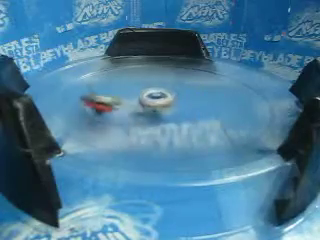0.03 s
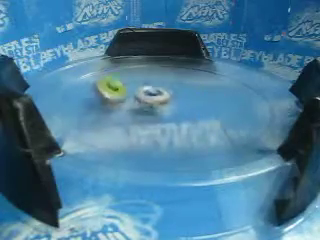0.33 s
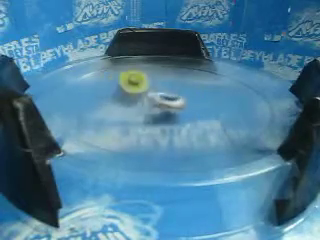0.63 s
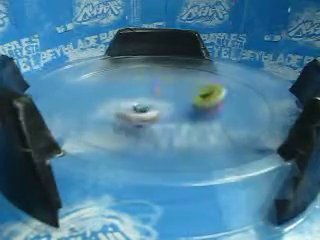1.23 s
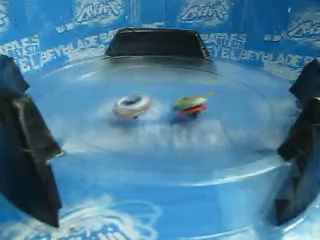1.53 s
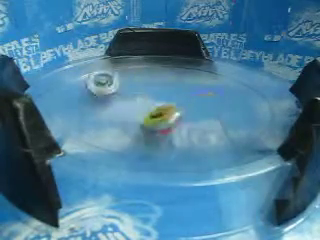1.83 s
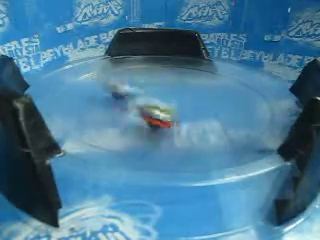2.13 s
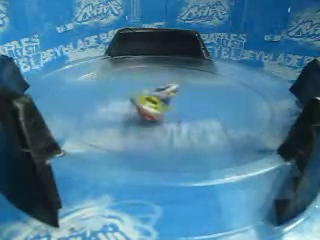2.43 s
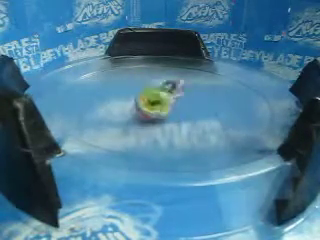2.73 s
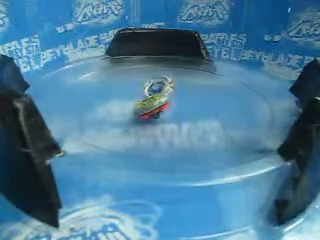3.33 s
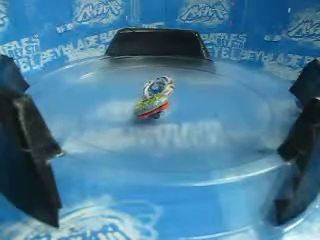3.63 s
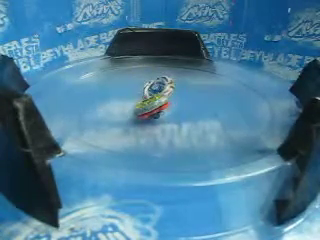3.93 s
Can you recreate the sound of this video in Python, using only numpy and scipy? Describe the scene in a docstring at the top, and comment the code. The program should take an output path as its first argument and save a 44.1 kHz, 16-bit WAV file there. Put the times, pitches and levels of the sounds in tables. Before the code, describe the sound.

Two spinning tops clatter together in a thin plastic bowl, in several bouts of rapid knocks with ringing metallic clinks. The knocks then fade, leaving a soft whirr. The microphone is close, in a small quiet room.

```python
"""A small quiet room, one microphone close to a thin plastic bowl where two metal-ringed tops spin.
Their tips whirr throughout. They jostle at once, each knock a click, a clack of the shell and a thud
of the bowl. At 0.6 s the metal rings meet and chime, fluttering with the spin. More bouts follow near
0.9, 1.6 and 2.1 s, each with a clink or a few; after 3 s only faint knocks are left over the whirr."""
import sys
import numpy as np
from scipy import signal
from scipy.fft import rfft, irfft, next_fast_len
from scipy.io import wavfile
from scipy.ndimage import map_coordinates

SR = 44100
rng = np.random.default_rng(int(sys.argv[2]) if len(sys.argv) > 2 else 0)


def unload_wav(signal):
    """Save mono or channel-first audio to the path in sys.argv[1] as 16-bit WAV at rate SR, clipped to [-1, 1]."""
    wavfile.write(
        sys.argv[1],
        SR,
        np.round(np.clip(np.atleast_2d(signal).T, -1, 1) * 32767).astype(np.int16),
    )


N = 4 * SR


def amp(db):
    """Decibels to gain."""
    return 10 ** (np.asarray(db) / 20)


def along(points, hz):
    """(f/Hz, value) points read on a log frequency axis."""
    f, v = np.transpose(points)
    return np.interp(np.log(hz + 1), np.log(f + 1), v)


def filtered(x, gain):
    """x times a gain that depends on frequency."""
    m = next_fast_len(x.shape[-1] + 600)
    return irfft(rfft(x, m) * gain(np.fft.rfftfreq(m, 1 / SR)), m)[..., :x.shape[-1]]


def noise(colour, shape):
    """Coloured noise of rms 1."""
    x = filtered(rng.standard_normal(shape), lambda hz: amp(along(colour, hz)))
    return x / x.std()


def fade(t, t60):
    """Exponential decay, 60 dB down after t60 seconds."""
    return np.exp(-np.log(1000) * t / t60)


def levelled(x, size):
    """Each row brought to rms 1 over its first samples."""
    return x / np.sqrt(np.mean(x[..., :size] ** 2, axis=-1, keepdims=True))


def burst(colour, count, rise_s, t60, size=2600):
    """Rows of short noise bursts: dense, quickly damped modes."""
    t = np.arange(size) / SR
    return noise(colour, (count, size)) * (1 - np.exp(-t / rise_s)) * fade(t, t60)


def placed(times, db, sounds):
    """Sounds laid out at their times and levels."""
    out = np.zeros(N + 2 * SR)
    for s, gain, sound in zip(times, amp(db), sounds):
        out[max(0, round(s * SR)):][:len(sound)] += gain * sound
    return out[:N]


# Decay of the small room: f/Hz, t60/s
ROOM_DECAY = [(100, 0.27), (300, 0.13), (1000, 0.28), (4000, 0.44), (9000, 0.38), (16000, 0.23)]
# Colour of the room at the microphone: f/Hz, level/dB
ROOM_COLOUR = [(70, -18), (130, 2.5), (230, -7.5), (450, -3), (1000, -7.5), (3000, -9.5), (7000, -10.5),
               (15000, -10)]
def room(x, count=12, delay_s=0.007):
    """The nearby walls answer; the tail changes as the tops move about."""
    hz, t, spectra = signal.stft(rng.standard_normal((count, SR * 2 // 5)), SR, nperseg=256)
    t60 = along(ROOM_DECAY, hz)[:, None]
    decay = fade(t, t60) * np.sqrt(2 * np.log(1000) / (t60 * SR))  # equal energy in every band
    colour = amp(along(ROOM_COLOUR, hz))[:, None]
    tails = signal.istft(spectra * decay * colour, SR, nperseg=256)[1]
    hop, overlap = N // count, SR // 100
    ramp = np.arange(hop + overlap) / overlap
    crossfade = np.sqrt(np.clip(np.minimum(ramp, ramp[::-1]), 0, 1))
    out = np.zeros(N + SR)
    for k, tail in enumerate(tails):
        piece = x[k * hop:][:len(crossfade)]
        wet = signal.fftconvolve(piece * crossfade[:len(piece)], tail)
        out[round(delay_s * SR) + k * hop:][:len(wet)] += wet
    return out[:N]


# Colour of a hard contact, heard close: f/Hz, level/dB
CONTACT_COLOUR = [(150, -60), (600, -24), (1600, 2), (2600, 5.5), (4000, 5.5), (6000, 1.5), (7000, -5),
                  (8500, -7.5), (11000, -18), (13500, -14.5), (16000, -59)]
def contacts(count, rise_s=0.00023, t60=0.024, size=2600):
    """Brief bright touches, the stuff of every tick and click in the bowl."""
    return burst(CONTACT_COLOUR, count, rise_s, t60, size)


# Rough overall colour of the steady low whirr; the small peaks and dips are incidental: f/Hz, level/dB
WHIRR_COLOUR = [(15, -37.5), (25, -11.5), (84, -8), (263, 2), (344, 1), (405, -5.5), (476, -1), (545, -7.5),
                (714, 0), (796, 0.5), (1020, 0.5), (1290, -9), (2220, -15), (2480, -10), (2760, -19),
                (3080, -17), (3620, -22), (11300, -30.5), (16000, -39)]
# The whirr at the microphone: t/s, level/dB
WHIRR_LEVEL = [(0, -41), (.8, -42), (1.5, -42), (2.8, -41.5), (3.4, -42.5), (4, -42.5)]
def whirr(spin_hz=29.1, wobble_db=0.5, ticks_per_s=24):
    """The tips rub on the floor, swelling once a turn, with faint random ticks."""
    t = np.arange(N) / SR
    drift = map_coordinates(rng.standard_normal(64), [t * 8])
    sway_db = wobble_db * np.sin(2 * np.pi * spin_hz * t + 2 * drift) + 0.5 * drift
    rub = amp(np.interp(t, *np.transpose(WHIRR_LEVEL)) + sway_db) * noise(WHIRR_COLOUR, N)
    count = int(ticks_per_s * N / SR)
    when, softness = rng.random((count, 2)).T
    ticks = levelled(contacts(count), size=180)
    return rub + placed(when * N / SR, -54 - 8 * softness, ticks)


def scrapes(knock_s, click_db, ticks_each=3, span_s=0.038):
    """After each knock the rim drags on for a moment in gritty ticks."""
    starts, db = np.repeat([knock_s, click_db], ticks_each, axis=1)
    lateness = rng.random(len(starts))
    ticks = levelled(contacts(len(starts), rise_s=0.0001, t60=0.011, size=400), size=100)
    return placed(starts + span_s * lateness, db - 14.5 + lateness, ticks)


# Modes of a metal ring: f/Hz
RING_HZ = [2455, 3100, 4587, 5295, 5927, 5950, 7640, 10562, 13040]
# The same modes, row for row: level/dB, t60/s
RING_MODES = [(-17, .5), (2, .04), (-3, .33), (1, .6), (-6, .33), (7, .035), (-18, .1), (-10, .35),
              (-9, .32)]
# Where a strike sets its low, main, high and overtone levels: f/Hz
STRIKE_HZ = [4587, 5295, 5927, 7640]
def chime(strike_db, flutter_hz, flutter_depth=0.42, wanders_per_s=156):
    """A struck ring; its spin splits every mode into a beating pair and blurs the highest."""
    t = np.arange(SR * 3 // 4) / SR
    beat = np.pi * flutter_hz * t
    out = np.zeros(len(t))
    for hz, (db, t60) in zip(RING_HZ, RING_MODES):
        wander = map_coordinates(rng.standard_normal(400), [t * wanders_per_s])
        blur = 0.94 * (hz / 10000) ** 2 * wander  # radians, from the motion of the top
        phase = 2 * np.pi * hz * t + blur + rng.uniform(0, 2 * np.pi)
        pair = np.sin(phase - beat) + flutter_depth * np.sin(phase + beat)
        out += amp(db + np.interp(hz, STRIKE_HZ, strike_db)) * pair * fade(t, t60)
    return out


# Colour of metal on metal, heard close: f/Hz, level/dB
CRACK_COLOUR = [(200, -70), (800, -6), (2000, -7.5), (3100, -2), (3900, -3.5), (4800, 5), (6000, -9.5),
                (6800, -0.5), (7700, -2.5), (10500, -11.5), (13000, -4.5), (16000, -14)]
def crack(db_per_octave):
    """The hard instant when ring hits ring, tilted brighter or duller."""
    colour = [(hz, db + db_per_octave * np.log2(hz)) for hz, db in CRACK_COLOUR]
    return levelled(burst(colour, 1, rise_s=0.0006, t60=0.012)[0], size=180)


# Ring against ring: t/s, crack level/dB, crack tilt/(dB per octave),
# low mode/dB, main mode/dB, high mode/dB, overtones/dB, flutter/Hz
RING_STRIKES = [(0.5968, -21.5, -2.5, -34, -35.5, -26, -64, 69),
                (1.0553, -27, 13, -60, -56, -60, -56, 46.3), (1.0623, -28.5, 0, -40, -49, -47, -58, 46),
                (1.735, -20.5, 3, -56, -41, -58.5, -54, 46),
                (2.2879, -15, 1.5, -32, -28.5, -21, -28.5, 25.2),
                (2.3384, -38, 4, -31, -28, -44, -33, 22.7), (2.417, -23.5, 3, -25, -48, -52, -51, 34.6)]
def clinks():
    """Metal meets metal: cracks, then chimes whose mix of modes is set by the point of contact."""
    times, crack_db, tilts = np.transpose(RING_STRIKES)[:3]
    cracks = [crack(tilt) for tilt in tilts]
    chimes = [chime(strike_db=row[3:7], flutter_hz=row[7]) for row in RING_STRIKES]
    return placed(times, crack_db, cracks), placed(times, np.zeros(len(times)), chimes)


# Modes of the bowl: f/Hz, level/dB, t60/s
BOWL_MODES = [(168, -8, .14), (223, -4, .15), (255, 4, .028), (322, -6, .08), (410, -13, .035),
              (584, -14, .08), (730, -12, .06)]
# Dense flexing of its thin wall: f/Hz, level/dB
FLEX_COLOUR = [(40, -23), (90, -21), (170, -6), (240, 0), (330, -3), (480, -8), (800, -20), (2000, -50)]
def thuds(count, pitch_spread=0.022, scatter_db=1.5, flex_db=-8):
    """The bowl is pushed down and swings back; the mix of modes depends on where it is hit."""
    t = np.arange(SR // 8) / SR
    modes = np.zeros((count, len(t)))
    for hz, db, t60 in BOWL_MODES:
        detune, strength = rng.standard_normal((2, count, 1))
        swing = np.sin(2 * np.pi * hz * (1 + pitch_spread * detune) * t)
        modes -= amp(db + scatter_db * strength) * swing * fade(t, t60)
    flex = levelled(burst(FLEX_COLOUR, count, rise_s=0.00038, t60=0.062, size=len(t)), size=400)
    return levelled(levelled(modes, size=400) + amp(flex_db) * flex, size=400)


# Colour of a top's plastic shell, heard close: f/Hz, level/dB
SHELL_COLOUR = [(60, -64), (200, -26), (450, -10), (700, -8.5), (900, -5), (1030, 1.5), (1230, -11.5),
                (1430, -2.5), (1800, -13.5), (2600, -17.5), (5000, -45.5)]
def clacks(pitch_hz, peak_s=0.003, mode_db=-2.5):
    """The shell answers with a cluster of modes; the place of the blow picks one that stands out."""
    cluster = levelled(burst(SHELL_COLOUR, len(pitch_hz), rise_s=0.0012, t60=0.048), size=350)
    t = np.arange(cluster.shape[1]) / SR
    swell = (t / peak_s * np.exp(-t / peak_s)) ** 2
    mode = levelled(np.sin(2 * np.pi * pitch_hz[:, None] * t) * swell, size=350)
    return levelled(cluster + amp(mode_db) * mode, size=350)


# Treble shelf of a click: f/Hz, multiple of the knock's treble/dB
TREBLE_SHELF = [(5500, 1), (9000, 2.5)]
def clicks(treble_db):
    """The contact that opens each knock, each with its own brightness."""
    touches = contacts(len(treble_db))
    shelved = filtered(touches, lambda hz: amp(treble_db[:, None] * along(TREBLE_SHELF, hz)))
    return levelled(shelved, size=180)


# The tops jostling just in front of the microphone, levels relative within each column:
# t/s, thud level/dB, clack level/dB, click level/dB, clack f/Hz, click treble/dB
KNOCKS = [(0.0005, -17, -23, -29, 970, 2), (0.0362, -15.5, -23.5, -26, 1395, -4),
          (0.0647, -20.5, -23, -28, 1050, 3.5), (0.0903, -16.5, -24, -29, 1140, 5),
          (0.1255, -22, -28, -31, 1005, 6.5), (0.1416, -23, -33, -35, 980, 0),
          (0.8702, -40, -37.5, -37.5, 1110, 2), (0.8855, -43, -42, -45, 900, 6),
          (0.909, -26, -33.5, -30.5, 966, 1), (0.929, -52.5, -21, -26.5, 923, 3),
          (0.943, -37, -34, -39, 990, 8), (0.9637, -20.5, -28.5, -31.5, 1160, -3),
          (0.968, -30.5, -48.5, -31, 1160, 1), (0.9877, -27, -20.5, -27, 1350, 3),
          (1.0101, -26, -28, -35, 980, 3), (1.0276, -21, -26.5, -28, 1110, 4),
          (1.0486, -49.5, -19.5, -23.5, 1000, 8), (1.0604, -18.5, -26, -26, 1315, 1),
          (1.0767, -16, -26, -30, 1140, 2), (1.1067, -14, -21, -24, 1105, 5),
          (1.1537, -19, -24.5, -29.5, 1156, 6), (1.1743, -25, -26.5, -32.5, 1010, 7),
          (1.1975, -26, -31.5, -36.5, 1060, -2.5), (1.5526, -27.5, -36.5, -38, 1030, 0),
          (1.5682, -52, -37.5, -43, 965, 1), (1.5751, -34, -29.5, -29.5, 1020, 5),
          (1.5925, -24.5, -33, -33, 1170, 3), (1.6171, -37, -29, -33, 1120, 5),
          (1.641, -24.5, -33, -29.5, 990, -2), (1.6626, -18.5, -24.5, -27.5, 1080, 3),
          (1.69, -22, -22.5, -23.5, 970, 5), (1.7214, -23.5, -16, -25.5, 1080, 10),
          (1.7467, -24, -30, -26, 1000, 7), (1.775, -20, -25.5, -28.5, 1010, 3),
          (1.7966, -35, -28.5, -34, 1040, 0), (1.8086, -21, -26.5, -29.5, 1080, 7.5),
          (1.8222, -49, -32, -36.5, 1070, 1), (1.8323, -29, -30, -35.5, 1230, 8),
          (1.8593, -20.5, -26, -30, 1110, -3), (1.899, -23, -22.5, -30, 1050, 5.5),
          (1.9134, -52, -41, -37.5, 1070, 5), (1.9539, -33, -40.5, -43, 1090, 1),
          (2.1155, -42, -45, -50, 1020, -6), (2.1505, -25.5, -28.5, -30.5, 1150, 3),
          (2.1848, -20.5, -31, -29, 1270, 1), (2.1948, -48, -25.5, -32.5, 1060, 9),
          (2.224, -15, -23.5, -24, 1040, 5.5), (2.2456, -28, -30.5, -38, 970, 5),
          (2.2614, -47, -35, -30.5, 1320, -0.5), (2.2722, -20, -42, -40, 1090, -2),
          (2.2793, -15, -28, -23.5, 1155, 1.5), (2.301, -48, -30, -42, 1380, 2),
          (2.3382, -19, -24, -25.5, 940, 2), (2.4064, -16.5, -22.5, -26, 1014, 4),
          (2.4169, -51, -24.5, -24, 1060, 6), (2.436, -48, -25.5, -33, 1083, -7),
          (2.4594, -27, -23.5, -32, 970, -4.5), (2.4769, -38, -38, -27, 1090, 1.5),
          (2.483, -24, -24.5, -28.5, 1060, -2), (2.5, -25, -27, -34, 1384, 1),
          (2.5537, -17, -22, -25.5, 1090, 2), (2.5953, -51, -20.5, -30, 1130, 8),
          (2.6168, -22.5, -25, -29, 1110, -2), (2.6508, -36, -30, -36, 1100, 0),
          (2.661, -23.5, -27, -35, 1170, -9), (2.6799, -23, -28, -30, 950, 3.5),
          (2.6892, -45, -37, -39, 1070, 0), (2.6993, -26, -31, -39, 1020, 4),
          (2.7074, -26.5, -35, -42, 1010, -2), (2.73, -49, -32, -35.5, 1030, 5),
          (2.7395, -23, -33, -34.5, 1094, 3), (2.7702, -37, -33.5, -36, 1340, 2),
          (2.7886, -30, -36.5, -38, 1160, -2), (2.8074, -31, -38, -44, 855, -3),
          (2.8329, -34, -34.5, -39.5, 976, -9), (2.8637, -30, -30.5, -31.5, 1026, 2),
          (2.8804, -29.5, -31, -37, 1050, -2), (2.893, -34, -30, -35.5, 960, -4),
          (2.9118, -35.5, -30.5, -38, 1120, 2), (2.9269, -22, -24.5, -32, 1177, 2),
          (2.946, -40, -32, -38, 1170, -3), (2.961, -50, -40, -40, 1050, -6.5),
          (2.9766, -49, -43, -42, 1150, -5), (2.9874, -28, -28.5, -33.5, 1116, -3),
          (3.0, -27.5, -33, -38, 980, -2), (3.1696, -45, -40, -44, 1000, 0),
          (3.1811, -57, -39, -47, 1080, -1), (3.1915, -34, -38, -43, 910, -2),
          (3.2493, -44, -41, -46, 950, -2), (3.2874, -50, -43.5, -49, 800, -3),
          (3.6665, -51, -43.5, -59, 980, -1), (3.7483, -68, -57, -50, 910, -6),
          (3.783, -60, -65, -50, 855, 7)]
def knocks(spike_s=0.0002):
    """Every knock: a pressure spike, a click, the shell's clack, the bowl's thud and a short scrape."""
    times, thud_db, clack_db, click_db, pitch_hz, treble_db = np.transpose(KNOCKS)
    age = np.arange(SR // 200) / SR / spike_s
    spike = (age - 1) * np.exp(-age)
    return (placed(times, click_db + 13, [spike] * len(times))
            + placed(times, click_db + 1, clicks(treble_db))
            + placed(times, thud_db - 3.5, thuds(len(times)))
            + placed(times, clack_db, clacks(pitch_hz))
            + scrapes(times, click_db))


def scene():
    """Knocks and clinks in the room, over the whirr of the tips; the small bowl radiates little bass."""
    bass_cut = signal.butter(2, 105, "highpass", fs=SR, output="sos")
    plastic = signal.sosfilt(bass_cut, knocks())
    cracks, chimes = clinks()
    echo = room(plastic + amp(2) * cracks + amp(-13) * chimes)
    return (plastic + cracks + chimes + echo + whirr())[None]


def record(dry):
    """One microphone, into a recorder that keeps nothing above its band limit."""
    return filtered(dry, lambda hz: hz < 15900)


dry = scene()
out = record(dry)
unload_wav(out)
```